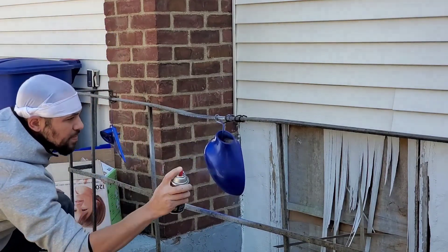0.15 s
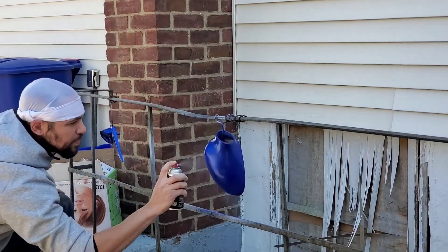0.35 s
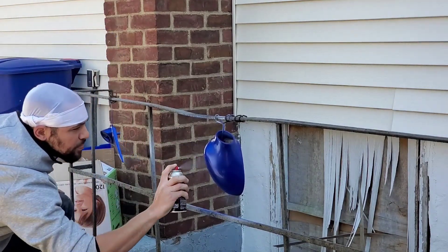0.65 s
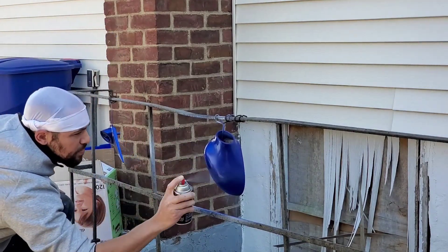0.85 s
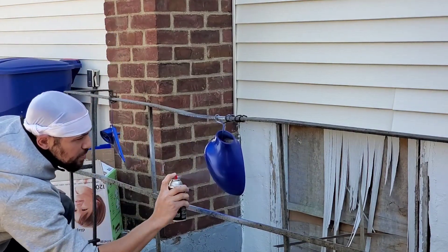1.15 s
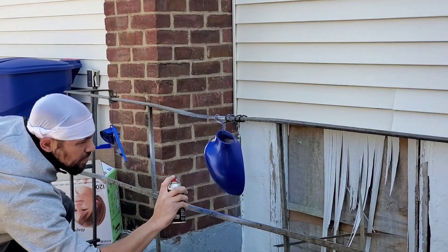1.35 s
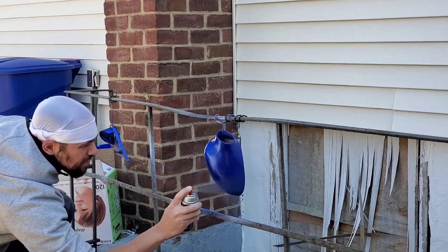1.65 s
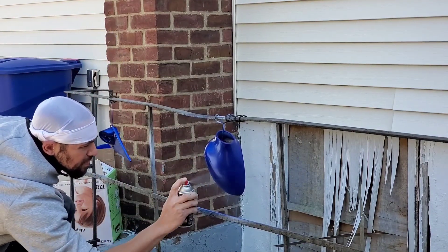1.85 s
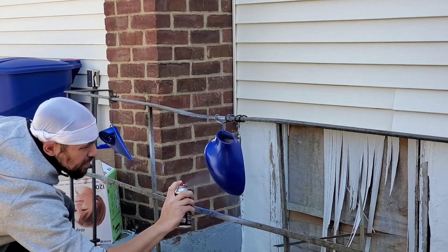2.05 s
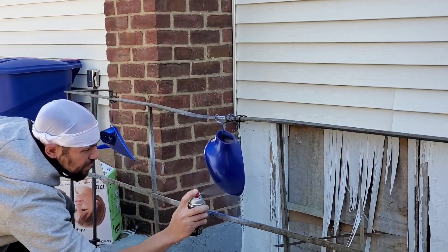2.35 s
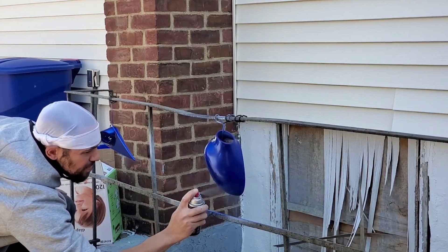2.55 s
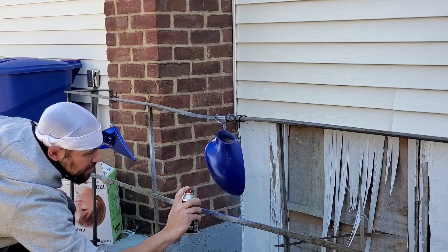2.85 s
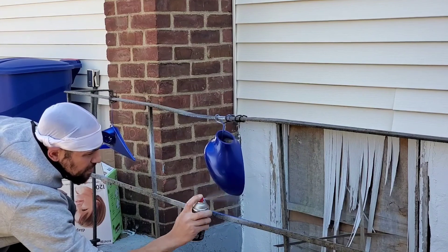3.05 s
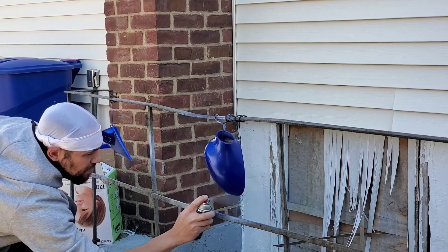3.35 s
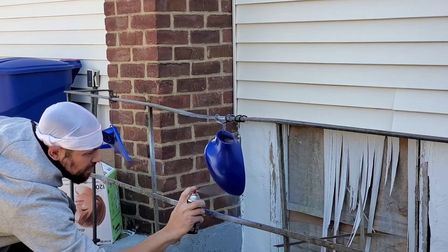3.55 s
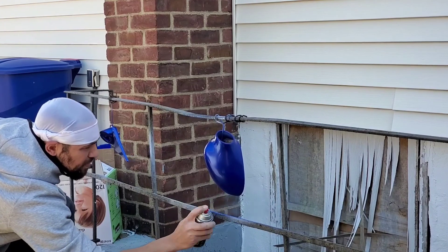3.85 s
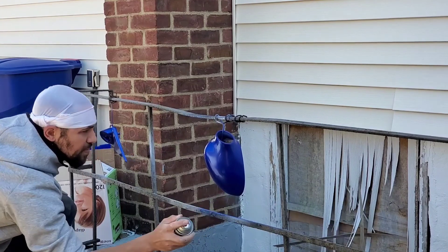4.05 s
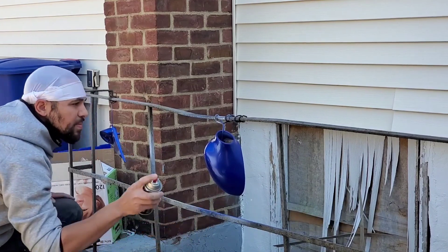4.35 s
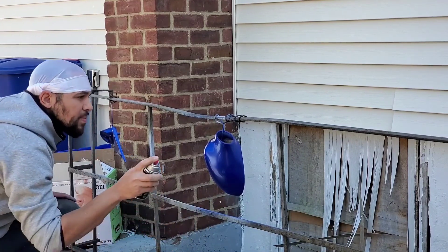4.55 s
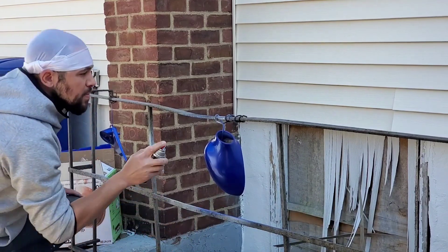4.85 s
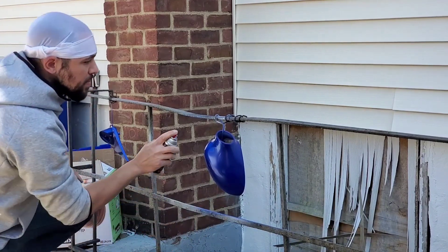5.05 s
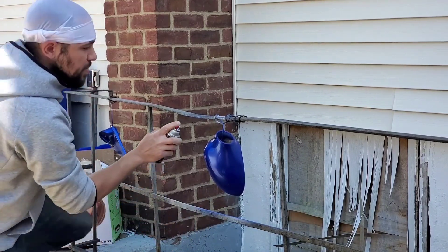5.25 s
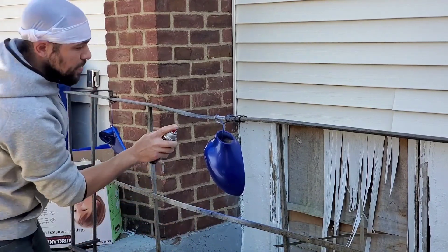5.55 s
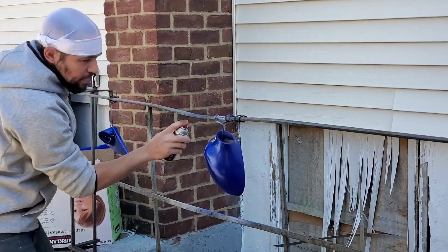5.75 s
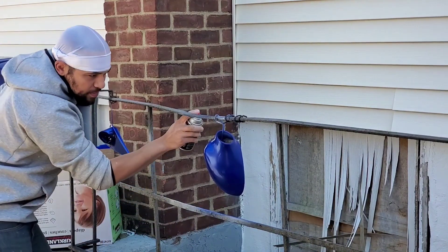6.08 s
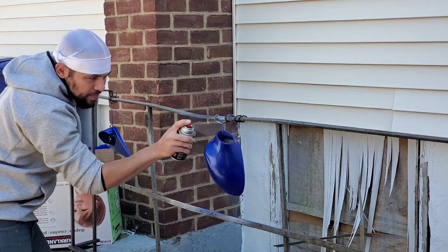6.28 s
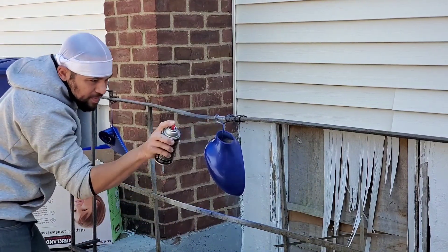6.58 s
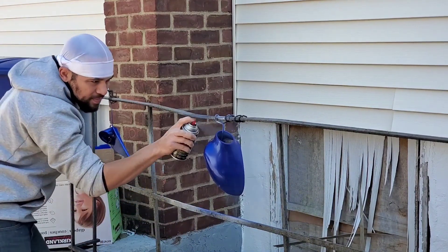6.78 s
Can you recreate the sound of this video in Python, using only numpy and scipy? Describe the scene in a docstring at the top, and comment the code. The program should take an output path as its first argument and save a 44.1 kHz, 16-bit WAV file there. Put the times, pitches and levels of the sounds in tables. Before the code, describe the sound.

An aerosol can sprays paint outdoors, close by and slightly to the right. From the start until about 4.1 seconds it hisses in roughly eleven short passes with tiny gaps, spitting around 0.4 seconds and spluttering now and then. The mixing ball ticks faintly near 1.9 and 2.7 seconds, then gives a brief, clearer metallic rattle at 4.2. During the pause that follows, clothes rustle and shoes scuff softly, with a few ticks of grit. A songbird whistles three long falling notes between 3.6 and 4.7 seconds, then gives a quick, even run of chirps until about 6.5, while a farther bird peeps faintly. The spray returns at 6.3 seconds for two more bursts, up to the end near 7. Wind rumbles and thumps on the microphone throughout, strongest from about 1 to 1.6 seconds, over a faint, dull wash of distant traffic.

```python
"""Spray painting by a brick wall.

An aerosol can hisses in short passes with one longer pause: a turbulent jet that spits and splutters.
The mixing ball rings the can, and the painter's shoes and clothes rub as they shift position.
A songbird whistles long falling notes and a run of chirps; a farther bird peeps.
Wind eddies buffet the two microphone ports over a distant wash of traffic."""
import sys
import numpy as np
from scipy import signal
from scipy.fft import rfft, irfft
from scipy.io import wavfile
from scipy.ndimage import uniform_filter1d

SR = 44100
rng = np.random.default_rng(int(sys.argv[2]) if len(sys.argv) > 2 else 0)


def unload_audio(sound):
    """Save the sound as a 16-bit wav file, at the path given as the first command line argument."""
    columns = np.transpose(np.atleast_2d(sound))
    # keep every value between -1 and 1, then stretch to whole-number steps
    steps = np.round(np.clip(columns, -1, 1) * 32767)
    wavfile.write(sys.argv[1], SR, steps.astype(np.int16))


N = 305172
TIME = np.arange(N) / SR
HZ = np.fft.rfftfreq(512, 1 / SR)
N_FRAMES = N // 128 + 5


def amp(db):
    """Decibels to gain."""
    return 10 ** (np.asarray(db) / 20)


def unit(x):
    """Scales to rms 1."""
    return x / np.sqrt(np.mean(abs(x) ** 2) + 1e-20)


def read(points, hz):
    """Reads a spectrum on a log-frequency axis."""
    f, value = np.transpose(points)
    return np.interp(np.log(hz + 1), np.log(f + 1), value)


def follow(rows, t):
    """Reads every column of a curve at the times t."""
    times, *columns = np.transpose(rows)
    return [np.interp(t, times, column) for column in columns]


def swell(t, centre_s, half_s):
    """Gaussian bump of height 1."""
    return np.exp(-((t - centre_s) / half_s) ** 2)


def panned(db):
    """Left and right gains for an L-R level difference."""
    return amp(np.array([[.5], [-.5]]) * db)


def port_power(db, pan_db):
    """Left and right power for a mean level and an L-R difference."""
    sides = panned(pan_db) ** 2
    return amp(db) ** 2 * sides / sides.mean(0)


def add(mix, start_s, sound):
    """Mixes a sound in at start_s."""
    part = mix[:, max(round(start_s * SR), 0):][:, :sound.shape[-1]]
    part += sound[..., :part.shape[1]]


def noise(size, shared):
    """Stereo white noise plus a common part of gain `shared`."""
    return rng.standard_normal((2, size)) + shared * rng.standard_normal(size)


def coloured(x, points):
    """Gives a signal a spectrum and rms 1."""
    size = x.shape[-1]
    gain = amp(read(points, np.fft.rfftfreq(size, 1 / SR)))
    return unit(irfft(rfft(x) * gain, size))


def drift(shape, cell):
    """Smooth random field of rms 1, with a cell size per axis."""
    x = rng.standard_normal(shape)
    for axis, count in enumerate(cell):
        x = uniform_filter1d(uniform_filter1d(x, count, axis), count, axis)
    return unit(x)


def port_noise(coherence):
    """Random short-time spectra at two partly coherent ports."""
    a, b, c, d = rng.standard_normal((4, N_FRAMES, len(HZ)))
    left, independent = a + 1j * b, c + 1j * d
    same = np.clip(read(coherence, HZ), -1, 1)
    return np.array([left, same * left + np.sqrt(1 - same ** 2) * independent])


def waves(spectra):
    """Short-time spectra to sound."""
    return signal.istft(spectra.swapaxes(1, 2), nperseg=512, noverlap=384)[1][:, :N]


def band_rms(x, band_hz):
    """Rms of the mid channel within a band."""
    sos = signal.butter(4, band_hz, "band", fs=SR, output="sos")
    return np.std(signal.sosfilt(sos, x.mean(0)))


def yard(x, t60_s, wet_db, dry=1):
    """Adds decaying scattered reflections, different at each port."""
    t = np.arange(SR // 2) / SR
    tail = rng.standard_normal((2, len(t))) * amp(-60 * t / t60_s) * (t > .003)
    tail /= np.linalg.norm(tail, axis=1, keepdims=True)
    return dry * x + amp(wet_db) * signal.fftconvolve(x, tail, axes=1)[:, :N]


def puffs(rows, colour, gain_db, rise_s):
    """Sudden, fast-decaying noise bursts."""
    out, t = np.zeros((2, N)), np.arange(4096) / SR
    for start_s, db, t60_s in rows:
        envelope = np.minimum(t / rise_s, 1) * amp(db + gain_db - 60 * t / t60_s)
        add(out, start_s, envelope * coloured(noise(len(t), shared=1), colour))
    return out


def tone(hz, db, waver, waver_samples=150):
    """A sine wavering about a pitch curve."""
    turns = np.cumsum(hz * (1 + waver * drift(hz.shape, cell=(waver_samples,)))) / SR
    return np.sqrt(2) * amp(db) * np.sin(2 * np.pi * turns) * signal.windows.tukey(len(hz), .12)


def slur(length_s, hz, octaves_per_s, db, ends_db, waver):
    """A gliding note, loudest in the middle."""
    t = np.arange(0, length_s, 1 / SR)
    return tone(hz * 2 ** (octaves_per_s * t), db + ends_db * (2 * t / length_s - 1) ** 2, waver)


# t/s, rumble/dB, tyres/dB
TRAFFIC_LEVELS = [(0, -56, -60.5), (1.2, -58.5, -64), (2.2, -58.5, -61.5), (3.1, -58, -60.5),
                  (4.85, -55.5, -56), (5.39, -55.5, -58), (5.75, -54.5, -54.5), (6.5, -54, -51.5),
                  (6.92, -56.5, -54.5)]
# spectrum: f/Hz, level/dB
TRAFFIC_COLOUR = [(59, -27.5), (100, 8.5), (130, -7.5), (248, -8.5), (290, -8.5), (329, -12), (436, -12.5),
                  (517, -13), (649, -14.5), (1200, -21.5), (1500, -18.5), (1950, -45), (3300, -120)]
# treble loss with distance: f/Hz, gain/dB
TRAFFIC_ROLLOFF = [(1500, 12), (2000, 8.5), (2600, -2), (3500, -9.5), (6000, -20.5), (14000, -28)]
# f/Hz, L-R coherence
TRAFFIC_COHERENCE = [(100, 1), (300, 0.93), (600, 0.4), (1000, 0.0082), (2000, 0.085), (6000, 0.044)]


def traffic(mottle_db=1.85):
    """Far engines and tyres merge into a dull, slowly swelling wash."""
    rumble_db, tyres_db = follow(TRAFFIC_LEVELS, TIME)
    colour_db = read(TRAFFIC_COLOUR, HZ.clip(0, 1450)) + read(TRAFFIC_ROLLOFF, HZ)
    spectra = port_noise(TRAFFIC_COHERENCE) * amp(colour_db)
    spectra *= amp(mottle_db * drift(spectra.shape[1:], cell=(24, 2)))
    upper = np.clip((HZ - 550) / 250, 0, 1)
    rumble, tyres = waves(spectra * (1 - upper)), waves(spectra * upper)
    rumble_rms, tyres_rms = band_rms(rumble + tyres, (330, 650)), band_rms(rumble + tyres, (700, 1400))
    return rumble / rumble_rms * amp(rumble_db) + tyres / tyres_rms * amp(tyres_db)


# t/s, length/s, f/Hz, level/dB
ENGINE_NOTES = [(0, 1.53, 137.3, -52), (3.55, 1.96, 847, -68)]


def engines():
    """Distant vehicles drone and whine."""
    out = np.zeros((2, N))
    for start_s, length_s, hz, db in ENGINE_NOTES:
        add(out, start_s, tone(np.full(round(length_s * SR), hz), db, waver=0.0193, waver_samples=2500))
    return out


# t/s, level/dB, L-R/dB
BREEZE = [(0, -48.5, -6), (.3, -45.5, 0), (.62, -40, 5), (.8, -47.5, -3), (1.35, -41.5, -1),
          (1.75, -41.5, -5.5), (2.25, -48, -2), (2.75, -44.5, -7), (3.3, -40, -10), (3.55, -51, 2.5),
          (4.6, -51, -5.5), (5.3, -51, -1.5), (6.05, -47.5, 3), (6.4, -53, -3), (6.92, -42, 3)]
# centre/s, half length/s, level/dB, L-R/dB
GUSTS = [(0.937, 0.13, -33, 6), (1.054, 0.054, -29, 0.5), (1.168, 0.008, -29, -9), (1.472, 0.088, -29, -3),
         (1.606, 0.075, -31.5, -4), (3.18, 0.065, -37, 1), (3.924, 0.039, -44, 11), (4.28, 0.11, -45, -18),
         (6.16, 0.056, -54, -9)]
# spectra: f/Hz, level/dB
LARGE_EDDY_COLOUR = [(8.8, -39), (15, -20), (37, 5), (61, 5), (142, -12), (221, -19), (450, -43),
                     (580, -51), (990, -120)]
SMALL_EDDY_COLOUR = [(60, -10), (130, 7), (180, -4), (280, -18.5), (500, -30), (1200, -61)]


def wind(gain_db=3, lumpy_db=5, breakup_db=-26):
    """Eddies buffet the ports; strong gusts break into smaller, faster ones."""
    power = port_power(*follow(BREEZE, TIME)) * amp(lumpy_db * drift((2, N), cell=(1, 2500))) ** 2
    for centre_s, half_s, db, pan_db in GUSTS:
        power += port_power(db, pan_db) * swell(TIME, centre_s, half_s) ** 2
    level_db = 10 * np.log10(power.mean(0))
    large = coloured(noise(N, shared=0.43), LARGE_EDDY_COLOUR)
    large /= np.sqrt(uniform_filter1d(large ** 2, size=4000) + 1e-9)
    small = coloured(rng.standard_normal((2, N)), SMALL_EDDY_COLOUR) * amp(level_db - breakup_db)
    return (large + small) * np.sqrt(power) * amp(gain_db)


# centre/s, level/dB, f/Hz, L-R/dB
EDDY_THUMPS = [(0.302, -19.5, 51.3, 0), (0.447, -27, 57.7, 7), (0.915, -15.5, 53, 16.5), (1.07, -36, 85, 5),
               (1.469, -29, 50.3, -5), (1.56, -25, 130, 1), (1.958, -23.5, 75, 2), (2.637, -19.5, 44, -8),
               (2.981, -29.5, 50, -24), (3.186, -25, 62, 6), (3.89, -28, 56.3, -4), (4.904, -24, 79, -4),
               (6.203, -21.5, 78.5, 7)]


def thumps(gain_db=-6.5, half_s=0.024):
    """Single eddies push on the ports for a few slow cycles."""
    out, t = np.zeros((2, N)), np.arange(-3000, 3000) / SR
    for centre_s, db, hz, pan_db in EDDY_THUMPS:
        turns = hz * t + rng.random() + 0.55 * rng.random((2, 1))
        push = swell(t, 0, half_s) * np.sin(2 * np.pi * turns)
        add(out, centre_s + t[0], amp(db + gain_db) * panned(pan_db) * push)
    return out


# t/s, length/s, f/Hz, glide/(oct/s), level/dB
FAR_PEEPS = [(4.347, 0.045, 4090, -0.016, -63), (4.416, 0.13, 3860, -0.048, -61),
             (4.945, 0.046, 4090, -0.083, -67), (5.067, 0.056, 4130, 0.065, -68),
             (5.173, 0.086, 4130, 0.075, -66), (5.238, 0.054, 3840, -0.13, -60),
             (5.671, 0.043, 3910, 0, -59.5), (5.905, 0.042, 4110, -0.062, -64),
             (5.959, 0.21, 3960, -0.4, -62)]


def far_bird(lead_s=.015, quaver_db=1.5):
    """Thin, broken notes that arrive only as reflections."""
    song = np.zeros((2, N))
    for start_s, length_s, hz, glide, db in FAR_PEEPS:
        add(song, start_s - lead_s, slur(length_s, hz, glide, db, ends_db=-4, waver=.014))
    reflections = yard(song, t60_s=0.39, wet_db=3, dry=0)
    return reflections * unit(amp(quaver_db * drift((2, N), cell=(1, 500))))


def chirp(length_s, tune, db, start_hz=2742, top_hz=2927, low_hz=2174, rise_share=0.302, ends_db=-5):
    """A quick hook up and down in pitch, strongest on the way down."""
    progress = np.linspace(0, 1, round(length_s * SR))
    rise = np.clip(progress / rise_share, 0, 1)
    fall = np.clip((progress - rise_share) / (1 - rise_share), 0, 1)
    hz = top_hz - (top_hz - start_hz) * (1 - rise) ** 2
    hz -= (top_hz - low_hz) * np.sin(np.pi / 2 * fall) ** 1.53
    return tone(tune * hz, db + ends_db * (2 * progress ** 0.99 - 1) ** 2, waver=0.021)


# delay/s, length/s, f/Hz, glide/(oct/s), level re chirp/dB
AFTERNOTES = [(0.051, 0.036, 2390, -8, -8), (0.13, 0.03, 1893, -0.5, -5.5)]


def chirp_run(first_s=4.886, period_s=.1872, count=9, level_db=-42.5, lead_s=.015):
    """Evenly spaced chirps, no two alike, each trailed by two soft falling notes."""
    out = np.zeros((2, N))
    for k, (stretch, detune, softness) in enumerate(rng.uniform(-1.11, 1, (count, 3))):
        beat_s, tune = first_s + k * period_s, 1 + .02 * detune
        add(out, beat_s - lead_s, chirp(.041 * (1 + .14 * stretch), tune, level_db - 1.5 * softness))
        for delay_s, length_s, hz, glide, db in AFTERNOTES:
            note = slur(length_s, hz * tune, glide, level_db + db, ends_db=-14, waver=0.014)
            add(out, beat_s + delay_s, note)
    return out


# t/s, length/s, start f/Hz, glide/(oct/s), level/dB
WHISTLES = [(3.638, 0.28, 2760, -1.0, -52), (3.9, 0.37, 2270, -0.61, -58.5),
            (4.304, 0.42, 3400, -1.58, -46.5)]
# delay/s, gain/dB
HOUSE_ECHOES = [(0.0055, -10), (0.014, -23), (.03, -18), (0.046, -11), (0.066, -17.5)]


def songbird(gain_db=-4, pan_db=-4.5, quaver_db=4, left_delay_s=0.00044, echo_fading_db=2):
    """Whistles and chirps from across the yard, echoed by the houses."""
    song = np.zeros((2, N))
    for start_s, length_s, hz, glide, db in WHISTLES:
        note = slur(length_s, hz, glide, db, ends_db=-9, waver=0.0066)
        add(song, start_s, note * amp(quaver_db * drift(note.shape, cell=(500,))))
    song += chirp_run()
    song[0] = np.roll(song[0], round(left_delay_s * SR))
    heard = song.copy()
    for delay_s, db in HOUSE_ECHOES:
        # moving air fades each path in and out
        add(heard, delay_s, amp(db + echo_fading_db * drift((2, N), cell=(1, 3000))) * song)
    return amp(gain_db) * panned(pan_db) * yard(heard, t60_s=0.49, wet_db=-1)


# peak/s, level/dB, rise/s, fade/s
SCUFFS = [(4.24, -60, 0.014, 0.02), (4.55, -60, 0.07, 0.064), (4.665, -64, 0.033, .04),
          (4.79, -67, 0.033, 0.035), (4.93, -60.5, 0.055, 0.03), (5.346, -44.5, 0.021, 0.034),
          (5.593, -57, 0.0091, 0.042), (5.70, -65.5, .04, 0.11), (6.085, -57.5, 0.097, 0.11),
          (6.21, -65, .02, .02)]
# spectrum: f/Hz, level/dB
SCUFF_COLOUR = [(700, -6.5), (1300, -9), (1900, 3.5), (2700, -3), (3900, -1), (5000, -2.5), (7500, -4),
                (9200, -7.5), (12500, -3), (14500, -10)]


def scuffs(gain_db=-1, grain_db=1.5, rustle_from_s=4.2, rustle_to_s=5.8, rustle_db=-72.5):
    """Soles and cloth rub as the painter rises."""
    rustling = 1. * ((TIME > rustle_from_s) & (TIME < rustle_to_s))
    power = amp(rustle_db) ** 2 * uniform_filter1d(rustling, size=800).clip(0, 1)
    for peak_s, db, rise_s, fade_s in SCUFFS:
        decay = np.maximum((peak_s - TIME) / rise_s, (TIME - peak_s) / fade_s).clip(0, 100)
        power += (amp(db) * np.exp(-decay)) ** 2
    rub = coloured(noise(N, shared=0.19), SCUFF_COLOUR) * amp(grain_db * drift((N,), cell=(110,)))
    return rub / band_rms(rub, (5000, 14500)) * amp(gain_db) * np.sqrt(power)


# centre/s, length/s, f/Hz, width/Hz, level/dB
FOOT_SCRAPES = [(4.551, 0.097, 1760, 700, -46), (5.344, 0.072, 1960, 330, -41.5),
                (6.053, 0.31, 720, 90, -51), (6.546, 0.074, 654, 400, -42.5)]


def scrapes():
    """A shifting foot makes dull swells of narrow-band friction noise."""
    out = np.zeros((2, N))
    for centre_s, length_s, hz, width_hz, db in FOOT_SCRAPES:
        size = round(length_s * SR)
        band = np.exp(-2 * ((np.fft.rfftfreq(size, 1 / SR) - hz) / width_hz) ** 2)
        rub = unit(irfft(rfft(noise(size, shared=1)) * band, size))
        add(out, centre_s - length_s / 2, amp(db) * np.hanning(size) * rub)
    return out


# t/s, level/dB, t60/s, low edge/Hz
GRIT_TICKS = [(4.887, -32, 0.017, 6950), (5.5755, -42, 0.012, 1010), (5.5888, -29, 0.012, 1000),
              (5.9893, -50, 0.012, 5000)]
# spectrum: f/Hz, level/dB
GRIT_COLOUR = [(1000, -20), (1900, 9), (2700, 5), (3200, -17), (4400, -17), (5000, 4.5), (6100, -1),
               (7000, -11), (8200, -4), (9500, -17), (11500, -3), (14000, -11)]


def grit():
    """Grains crack under a shoe; the smaller the grain, the thinner its tick."""
    out = np.zeros((2, N))
    for start_s, db, t60_s, low_hz in GRIT_TICKS:
        tick = puffs([(start_s, db, t60_s)], GRIT_COLOUR, gain_db=-4, rise_s=.0003)
        out += signal.sosfilt(signal.butter(3, low_hz, "high", fs=SR, output="sos"), tick)
    return out


# t/s, level/dB
BALL_KNOCKS = [(1.848, -40), (1.87, -39), (1.8908, -40), (1.905, -41), (2.659, -46), (2.679, -47),
               (3.012, -53), (4.1895, -32), (4.2207, -35.5), (4.246, -38), (4.259, -44)]
# f/Hz, level/dB, t60/s
CAN_MODES = [(2810, -7, 0.033), (3610, -10, 0.023), (3735, -3.5, 0.037), (3825, -1.5, 0.026),
             (4030, -12, .05), (4860, -12, 0.02), (7450, -22, .025), (12400, -24, .02)]


def mixing_ball(gain_db=-3.5, tick_db=-7.5, tick_s=0.0041):
    """Each knock of the ball is a tick that rings the can."""
    out, t = np.zeros((2, N)), np.arange(8000) / SR
    for start_s, db in BALL_KNOCKS:
        ring = 0
        for hz, mode_db, t60_s in CAN_MODES:
            turns = hz * t + rng.random() + 0.16 * rng.random((2, 1))
            ring += amp(mode_db - 60 * t / t60_s) * np.sin(2 * np.pi * turns)
        tick = amp(tick_db) * np.exp(-t / tick_s) * rng.standard_normal((2, len(t)))
        add(out, start_s, amp(db + gain_db) * (ring + tick))
    return out


# t/s, level/dB, t60/s
SPITS = [(.3655, -38, 0.02), (.406, -34, 0.012), (.4328, -39.5, 0.012), (.4532, -40, 0.0064),
         (.6024, -47.5, 0.026), (1.056, -44.5, 0.032), (1.919, -55, 0.053)]
# spectrum: f/Hz, level/dB
SPIT_COLOUR = [(700, -35), (1250, -3.5), (2100, 5.5), (4100, 2.5), (6000, -11), (9000, -17), (14000, -12)]


def spits():
    """The nozzle spits clots of paint."""
    return puffs(SPITS, SPIT_COLOUR, gain_db=11.5, rise_s=0.00068)


# centre/s, half length/s, level/dB
SPLUTTERS = [(0.686, 0.038, -50.5), (1.407, 0.041, -51), (1.838, 0.032, -52.5), (2.64, 0.045, -50),
             (2.968, 0.018, -54), (3.354, .03, -49), (4.11, 0.036, -48.5), (6.66, 0.02, -61)]
# spectrum: f/Hz, level/dB
SPLUTTER_COLOUR = [(500, -9), (1000, -10), (1500, -1), (2100, 2.5), (2800, -12), (5000, -26), (14000, -40)]


def splutters(grain_db=3, pan_db=-2):
    """The half-shut valve breaks the paint into coarse drops: a low, grainy rasp."""
    drops = coloured(noise(N, shared=1), SPLUTTER_COLOUR) * amp(grain_db * drift((N,), cell=(90,)))
    envelope = sum(amp(db) * swell(TIME, centre_s, half_s) for centre_s, half_s, db in SPLUTTERS)
    return panned(pan_db) * envelope * unit(drops)


# off the hand, the painted part and the bricks: delay/s, gain/dB
JET_BOUNCES = [(.001, -14), (.0022, -14), (.0047, -12), (.0079, -11), (.0118, -11), (.0163, -12)]


def bounce_ripple(sway_s=0.0001085):
    """Near reflections comb the jet's spectrum; the ripple slides as the hand sweeps."""
    ripple = 1
    for delay_s, db in JET_BOUNCES:
        path_s = delay_s + sway_s * drift((2, N_FRAMES, 1), cell=(1, 90))
        ripple += amp(db) * np.exp(-2j * np.pi * HZ * path_s)
    return abs(ripple)


# spectrum: f/Hz, level/dB
JET_COLOUR = [(1470, -35), (2500, 4), (3560, 8), (4600, 6.5), (5200, 1), (5800, -0.5), (6460, -8.5),
              (7300, -2), (8860, -8.5), (9400, -9), (10600, -9), (12200, -1.5), (13500, -5), (14500, -52)]
# thinning towards the bass: f/Hz, gain/dB
JET_LOW_END = [(200, -25), (700, -21), (1200, -31), (1700, -0.5), (2100, 8), (2350, -2), (2600, 7),
               (2800, 6.5)]
# f/Hz, L-R/dB
JET_BALANCE = [(1000, 3), (2500, 4.5), (5000, 3.5), (7500, 3.5), (10000, 6.5), (13000, 2.5)]
# f/Hz, L-R coherence
JET_COHERENCE = [(500, .5), (1300, 0.39), (2200, 0.87), (4500, 0.54), (6400, 0.39), (7600, 0.82),
                 (9500, 0.041), (13000, 0.88)]
# f/Hz, left lead/rad
JET_PHASE = [(500, -1.5), (4700, 0.28), (5400, 0.99), (6200, -0.071), (8500, -1.7), (10000, 0.15),
             (14000, -2.05)]


def jet(port_sway_s=6e-6, mottle_db=2.5, flutter_db=0.5):
    """Turbulent noise of the open nozzle, split into upper hiss and lower body."""
    colour_db = read(JET_COLOUR, HZ.clip(2800, 13400)) + read(JET_LOW_END, HZ)
    spectra = port_noise(JET_COHERENCE) * amp(colour_db)
    spectra *= panned(read(JET_BALANCE, HZ))[:, None] * bounce_ripple()
    # the moving hand shifts the delay between the ports
    port_delay_s = port_sway_s * drift((N_FRAMES, 1), cell=(200, 1))
    spectra[0] *= np.exp(1j * (read(JET_PHASE, HZ) + 2 * np.pi * HZ * port_delay_s))
    # faint, narrow random streaks mottle the hiss, and its level flutters slightly
    spectra *= amp(mottle_db * drift(spectra.shape[1:], cell=(22, 2)))
    spectra *= amp(flutter_db * drift((N_FRAMES, 1), cell=(4, 1)))
    upper = np.clip((HZ - 4400) / 1800, 0, 1)
    hiss, body = waves(spectra * upper), waves(spectra * (1 - upper))
    return hiss / band_rms(hiss + body, (5500, 14500)), body / band_rms(hiss + body, (2500, 5000))


# nozzle held down: from/s, to/s, level/dB, body re hiss/dB, dribble re press/dB
PRESSES = [(0, 0.269, -45.5, 0, -15), (0.383, 0.678, -46.5, 0.7, -7), (0.778, 1.054, -45.7, -0.5, -11.5),
           (1.139, 1.424, -47, -1, -6), (1.543, 1.832, -46.5, -1.3, -18), (1.921, 2.229, -46.5, -2, -7),
           (2.349, 2.621, -46, -0.5, -9), (2.706, 2.954, -45, -3.3, -10.5), (3.065, 3.339, -47, 0.5, -11.5),
           (3.418, 3.747, -48, 0.4, -13), (3.855, 4.117, -46.5, 0, -17), (6.264, 6.666, -47.5, 2, -17.5),
           (6.771, 6.917, -49, 0.5, -20)]
# the jet sweeps over the part: centre/s, half length/s, hiss gain/dB, body gain/dB
FLARES = [(0.13, 0.026, 1.5, 2.5), (0.258, 0.028, 1, 3.5), (0.589, 0.023, 5, 0.5), (0.674, 0.023, 7.5, -1),
          (0.813, 0.03, 5, 0), (0.902, 0.02, 6.5, 2.5), (1.25, 0.056, 4, -0.5), (1.615, 0.014, 6, 1.5),
          (2.052, 0.039, 5, -1.5), (2.18, 0.06, 2, -2), (2.395, 0.04, 5, -1), (3.725, 0.078, 3, 1),
          (3.956, 0.01, 4.5, 1), (4.1, 0.02, 5.5, 2), (6.535, 0.022, 2.5, 4), (6.894, 0.026, 4.5, 3)]


def spray(lead_s=0.012, rise_s=0.016, close_db_per_s=430, dribble_s=0.1, creep_db_per_s=0.5,
          hiss_db=0.02, body_db=-1.5, wander_db=0.63, pan_db=-5.5, onset_pan_db=-5.5, onset_s=0.0094):
    """The valve snaps open on the jet and eases shut; then the last gas dribbles out."""
    hiss, body = jet()
    flare_db = sum(db * swell(TIME, centre_s, half_s) for centre_s, half_s, db, _ in FLARES)
    body_flare_db = sum(db * swell(TIME, centre_s, half_s) for centre_s, half_s, _, db in FLARES)
    unsteady_hand_db = wander_db * drift((N,), cell=(1800,))
    out = np.zeros((2, N))
    for start_s, stop_s, press_db, full_db, dribble_db in PRESSES:
        on = (TIME >= start_s - lead_s) & (TIME < stop_s + .12)
        t = TIME[on]
        held_s, shut_s = np.maximum(t - start_s, 0), np.maximum(t - stop_s, 0)
        opening = np.clip((t - start_s + lead_s) / rise_s, 0, 1) ** 2
        closing = amp(-close_db_per_s * shut_s)
        valve = opening * np.maximum(closing, amp(dribble_db) * np.exp(-shut_s / dribble_s))
        fullness_db = body_db + full_db + body_flare_db[on] + unsteady_hand_db[on]
        fullness_db += 2 * swell(t, stop_s, half_s=0.0063)  # coarser as the valve starts to close
        fullness_db += 4 * (1 - closing)  # the dribble is duller
        flow = amp(hiss_db + flare_db[on]) * hiss[:, on] + amp(fullness_db) * body[:, on]
        # further right at the onset and in flares
        side_db = pan_db + onset_pan_db * np.exp(-held_s / onset_s) - 0.42 * flare_db[on]
        out[:, on] += valve * amp(press_db + creep_db_per_s * held_s) * panned(side_db) * flow
    return out


def scene():
    """The painter near the wall, with birds, traffic and wind around."""
    paint = yard(spray() + splutters(), t60_s=0.053, wet_db=-5)
    knocks = yard(spits() + mixing_ball(), t60_s=0.15, wet_db=-1.5)
    movement = scuffs() + scrapes() + grit()
    background = traffic() + engines() + wind() + thumps() + far_bird() + songbird()
    return background + movement + knocks + paint


def record(dry, edge_hz=14650):
    """The recorder's band limit."""
    low_pass = signal.firwin(401, edge_hz, window=("kaiser", 9), fs=SR)
    return signal.oaconvolve(dry, low_pass[None], "same")


dry = scene()
out = record(dry)
unload_audio(out)
```